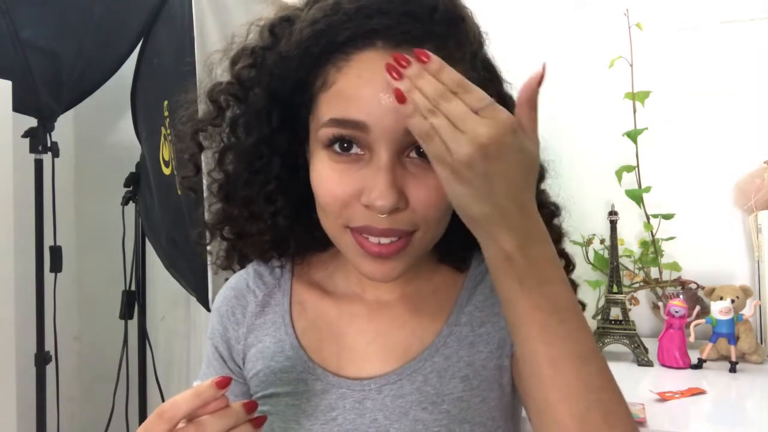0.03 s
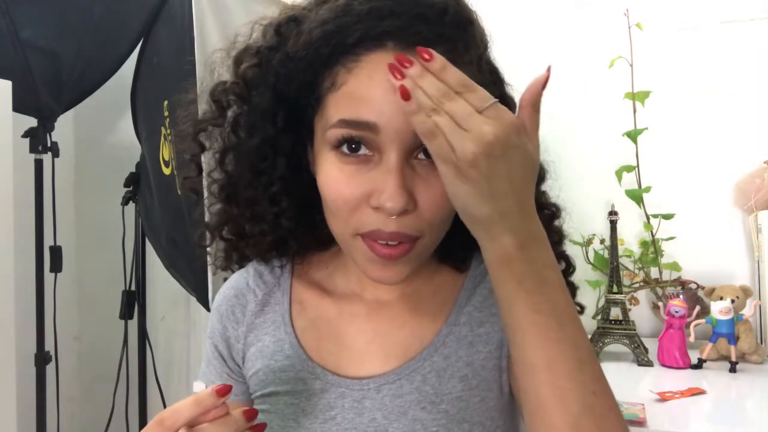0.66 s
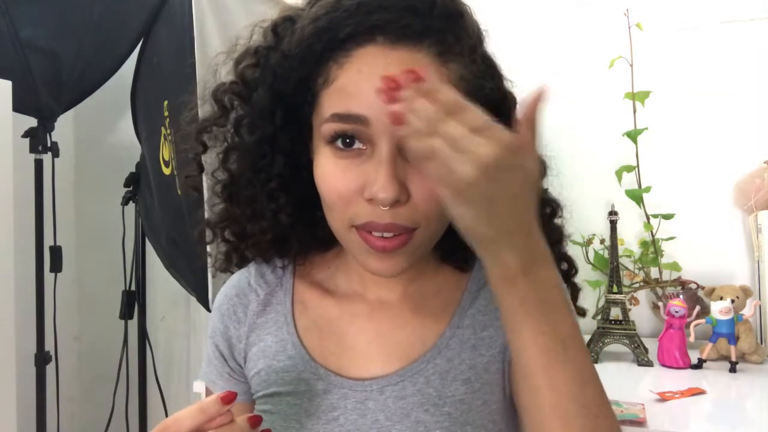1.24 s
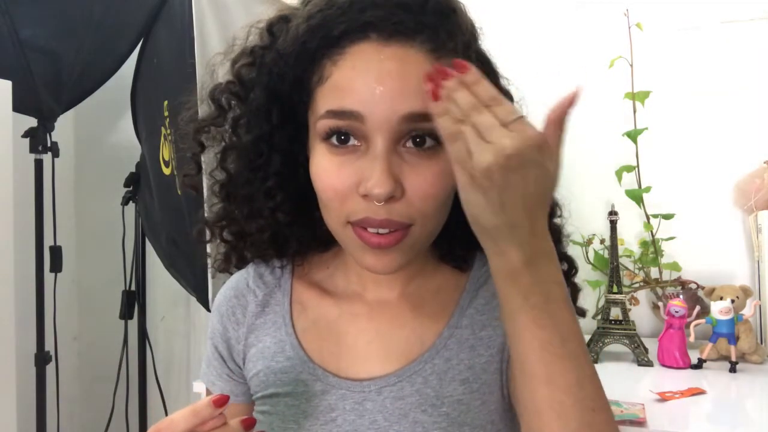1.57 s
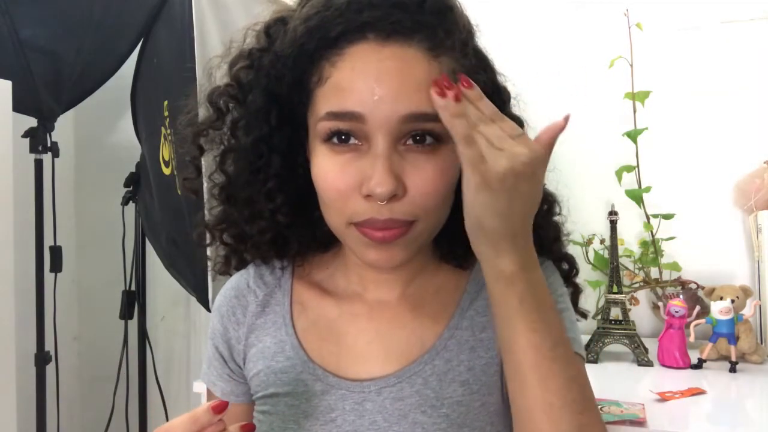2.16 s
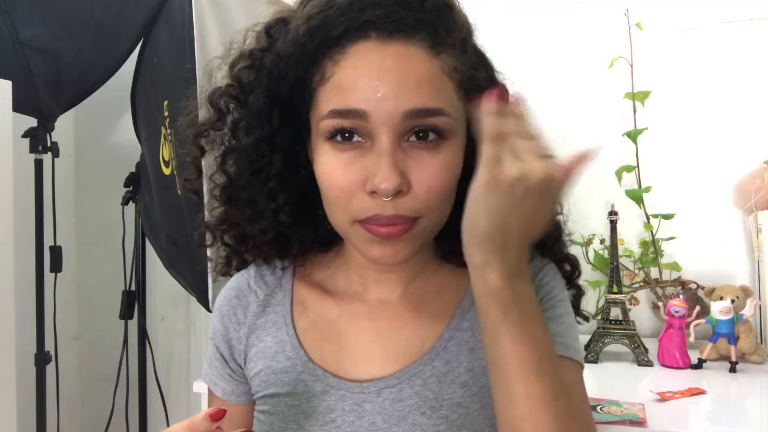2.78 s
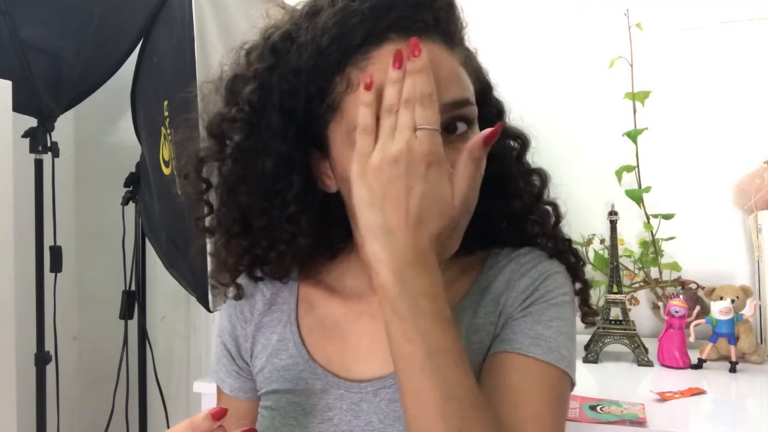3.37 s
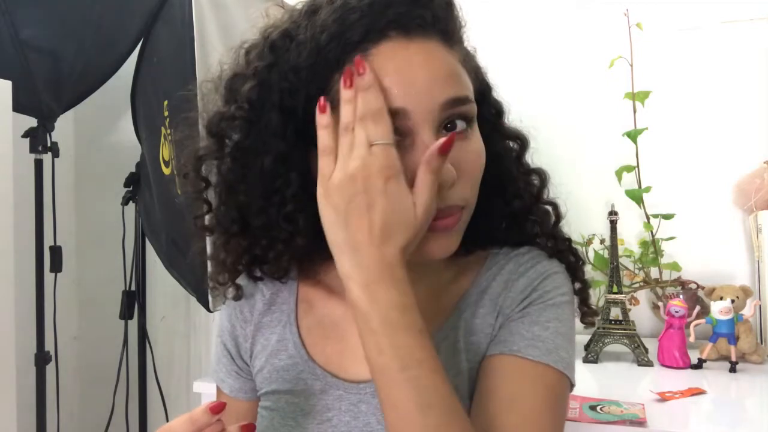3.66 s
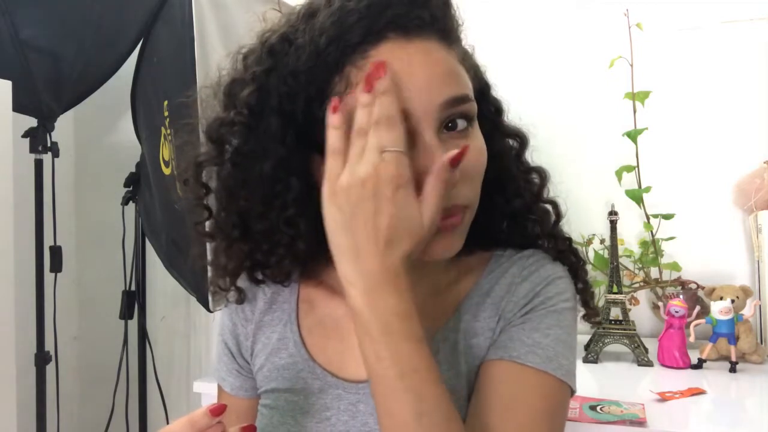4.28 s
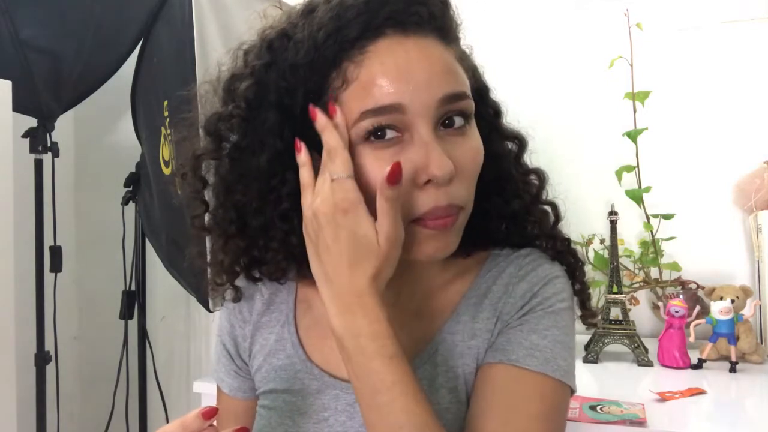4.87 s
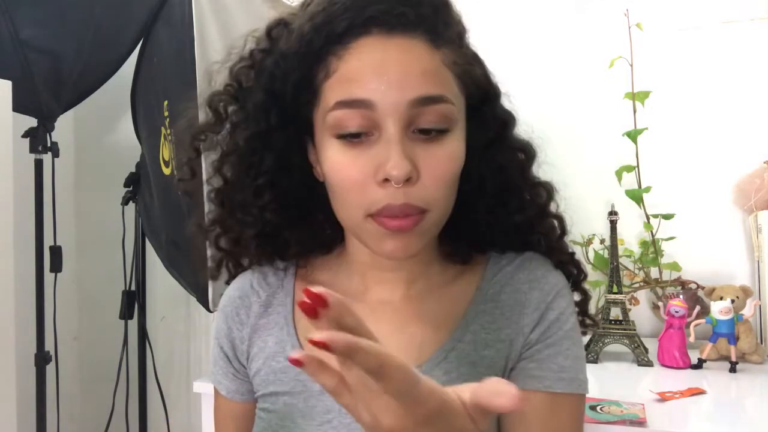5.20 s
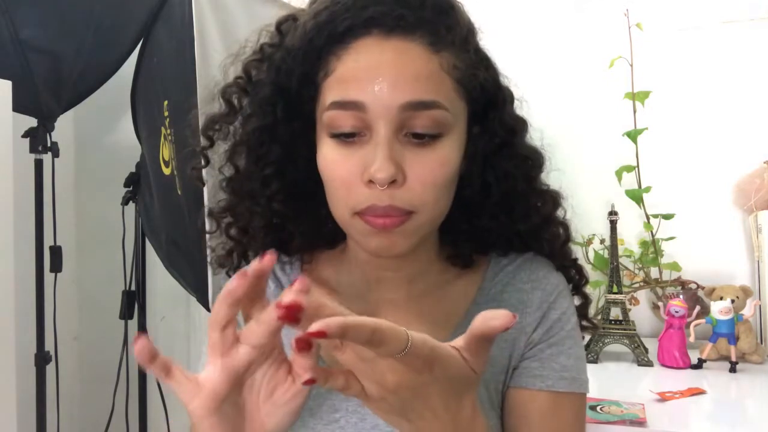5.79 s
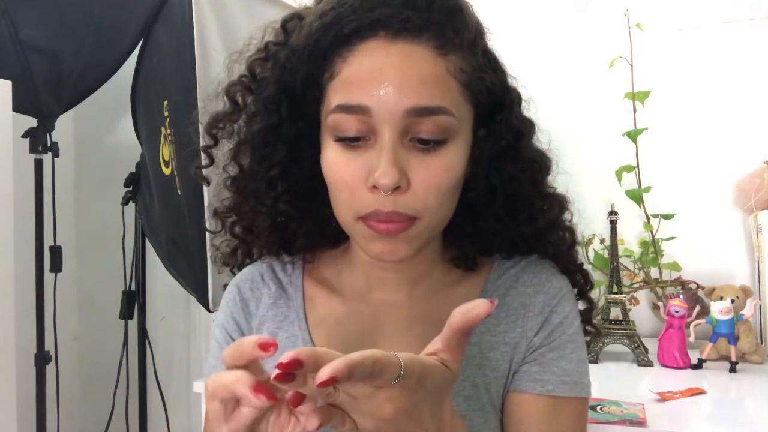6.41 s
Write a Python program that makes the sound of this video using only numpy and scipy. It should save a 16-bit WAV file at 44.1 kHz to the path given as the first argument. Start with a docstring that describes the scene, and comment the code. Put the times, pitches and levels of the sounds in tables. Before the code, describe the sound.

A fan runs in a small room, its low tone swelling and fading beneath a thin, fluttering whine. A steady electrical hum and soft air noise lie under it. A close pair of short high chirps comes early and rings briefly, and a fainter chirp follows later. Fingers brush very lightly over facial skin, and near the end a moving arm stirs a faint rumble at the microphone.

```python
"""A fan's blade tone swells and fades in a small room, while its airflow whines in the housing.
Beneath it lie the steady hum of a second rotor and of mains-powered gear, and soft air noise.
Short high chirps sound twice, first as a close pair, and ring briefly in the room.
Fingers brush over skin with a light friction hiss, and a moving arm stirs a faint rumble."""
import sys
import numpy as np
from scipy import signal
from scipy.fft import rfft, irfft, next_fast_len
from scipy.io import wavfile
from scipy.ndimage import uniform_filter1d

SR = 44100
rng = np.random.default_rng(int(sys.argv[2]) if len(sys.argv) > 2 else 0)


def output_pcm(signal):
    """Save a mono or channel-first signal as 16-bit PCM at the path in sys.argv[1].

    Samples are clipped to [-1, 1] before scaling.
    """
    pcm = np.clip(np.atleast_2d(signal).T, -1, 1) * 32767
    wavfile.write(sys.argv[1], SR, np.round(pcm).astype(np.int16))


N = 284445
TIME = np.arange(N) / SR


def from_db(db):
    """Amplitude ratio of a level: tenfold for every 20 dB."""
    return 10 ** (np.asarray(db) / 20)


def rms_one(x):
    """Normalisation to unit mean power."""
    return x / np.sqrt(np.mean(x ** 2) + 1e-20)


def in_time(rows):
    """Linear interpolation of (t/s, value) points at every sample."""
    return np.interp(TIME, *np.transpose(rows))


def coloured(x, gain_at):
    """Zero-phase filtering: the spectrum is multiplied by a gain that depends on frequency."""
    size = next_fast_len(N)
    hz = np.arange(size // 2 + 1) * SR / size
    return irfft(rfft(x, size) * gain_at(hz), size)[:N]


def resonant_noise(centre_hz, width_hz):
    """Random excitation of a resonance, applied twice, gives a band of noise; rms 1."""
    response = lambda hz: 1 / (1 + ((hz - centre_hz) / (.78 * width_hz)) ** 2)
    return rms_one(coloured(rng.standard_normal(N), response))


def drift(rate_hz):
    """Random fluctuation as low-pass noise; rms 1."""
    return resonant_noise(0, rate_hz)


def tone(hz):
    """A sine of rms 1: its phase is the integral of frequency, from a random start."""
    cycles = np.cumsum(hz * np.ones(N)) / SR + rng.random()
    return np.sqrt(2) * np.sin(2 * np.pi * cycles)


def room(x, wet_db, t60_s=0.57):
    """Reverberation: a diffuse, exponentially decaying tail joins the direct sound."""
    t = TIME[:SR // 2]
    tail = rng.standard_normal(len(t)) * from_db(-60 * t / t60_s)
    return x + from_db(wet_db) * signal.fftconvolve(x, tail / np.linalg.norm(tail))[:N]


def air_noise():
    """Broadband noise of the room's air, its spectral density falling towards the treble."""
    # air noise spectrum: f/Hz, density level/dB per Hz
    spectrum = [(20, -112), (45, -84.5), (110, -83), (150, -88), (250, -79.5), (450, -85), (800, -88),
                (1250, -87.5), (2000, -94.5), (2800, -96.5), (4400, -99.3), (6800, -102.7), (8300, -110),
                (16000, -121)]
    points_hz, points_db = np.transpose(spectrum)
    white = rng.standard_normal(N) * np.sqrt(SR / 2)   # 0 dB per Hz
    return coloured(white, lambda hz: from_db(np.interp(np.log(hz + 1), np.log(points_hz), points_db)))


def microphone_hiss(level_db):
    """Self-noise of the microphone: white, with equal power in every hertz."""
    return from_db(level_db) * rng.standard_normal(N)


def faint_bands():
    """Narrow-band noise: faint steady bands, one a thin ring at the chirps' pitch."""
    # bands of noise: f/Hz, width/Hz, level/dB
    bands = [(179, 18, -70.5), (330, 64, -62.5), (1298, 44, -64.5), (1827, 50, -70), (2201, 74, -69.5),
             (2375, 180, -69), (3873, 75, -76.5), (4490, 110, -76), (4676, 33, -78.5), (9000, 930, -85)]
    return sum(from_db(db) * resonant_noise(hz, width) for hz, width, db in bands)


def arm_rumble(peak_s, peak_db, fade_db_per_s):
    """Air displaced by a passing arm: low noise that rises and dies away exponentially."""
    envelope = from_db(peak_db - fade_db_per_s * np.abs(TIME - peak_s))
    return envelope * resonant_noise(centre_hz=50, width_hz=17)


def finger_rubs(centre_hz, width_hz, grain_db):
    """Sliding friction on skin: slightly grainy noise that swells and fades with each stroke."""
    # finger strokes: middle t/s, duration/s, level/dB
    strokes = [(1.5, .05, -73), (5.09, .13, -74), (5.5, .07, -71)]
    envelope = sum(from_db(db) * np.exp(-(2 * (TIME - s) / length) ** 2) for s, length, db in strokes)
    friction = resonant_noise(centre_hz, width_hz) * from_db(grain_db * drift(120))
    return envelope * rms_one(friction)


def chirps(roughness, octave_db):
    """Rapid random frequency modulation makes short whistles raspy; each has a weak octave."""
    # whistles: start t/s, duration/s, start f/Hz, end f/Hz, level/dB
    whistles = [(0.838, 0.027, 4740, 4620, -56.5), (0.861, 0.052, 4660, 4670, -55.5),
                (2.786, 0.06, 5250, 5040, -72)]
    out = np.zeros(N)
    for start, length, from_hz, to_hz, db in whistles:
        progress = np.clip((TIME - start) / length, 0, 1)
        hz = (from_hz + (to_hz - from_hz) * progress) * (1 + roughness * drift(510))
        swell = np.sqrt(np.abs(np.sin(np.pi * progress)))
        out += from_db(db) * swell * (tone(hz) + from_db(octave_db) * tone(2 * hz))
    return out


def machine_hum(rotor_hz, mains_hz, wander, waver_hz):
    """Periodic forces give a line spectrum; magnetic pull at twice the mains rate adds sidebands."""
    # harmonics of the steady rotor: multiple of its turning rate, level/dB
    rotor_orders = [(2, -74), (3, -72), (4, -62), (5, -59.5), (6, -64), (7, -68), (8, -66.5), (10, -68),
                    (11, -71)]
    # orders shifted up by the magnetic pull: multiple of the turning rate, level/dB
    shifted_orders = [(2, -63.5), (4, -63), (5, -68.5), (7, -71.5), (8, -70.5)]
    # mains hum: multiple of the mains rate, level/dB
    mains_harmonics = [(2, -74.5), (4, -55.5)]
    # other motor drones and thin electronic whistles: f/Hz, level/dB
    lone_tones = [(57.2, -73), (89.5, -71), (118.4, -67), (879, -79), (1064, -92), (4560, -81.5),
                  (5615, -79.5), (6910, -102), (7978, -86.5)]
    turning_hz = rotor_hz * (1 + wander * drift(1.26))
    orders = sum(from_db(db) * tone(k * turning_hz) for k, db in rotor_orders)
    sidebands = sum(from_db(db) * tone(k * turning_hz + 2 * mains_hz) for k, db in shifted_orders)
    mains = sum(from_db(db) * tone(k * mains_hz) for k, db in mains_harmonics)
    lone = sum(from_db(db) * tone(hz + waver_hz * drift(2.2)) for hz, db in lone_tones)
    return orders + sidebands + mains + lone


def housing_whine(even_s, gain_db, sway_db):
    """Airflow excites the housing's modes into a fluttering whine near 1.5 kHz."""
    # main modes of the fan housing: f/Hz, width/Hz, relative level/dB
    modes = [(1466.6, 46, -6), (1484, 13.6, -4), (1521.5, 15.5, -6), (1537, 64, -9), (1624, 62, -10)]
    # slow envelope of the whine: t/s, level before gain/dB
    envelope = [(0.0, -52), (0.03, -49), (0.86, -53), (0.99, -49), (2.96, -51.5), (3.07, -46.5),
                (3.14, -50), (5.12, -49.5), (5.71, -46.5), (5.77, -52), (5.89, -49), (6.45, -50.5)]
    whine = sum(from_db(db) * resonant_noise(hz, width) for hz, width, db in modes)
    # the fast flutter stays; the slow level is evened out, then sways with the airflow
    whine /= np.sqrt(uniform_filter1d(whine ** 2, int(even_s * SR)))
    level_db = in_time(envelope) + gain_db + sway_db * drift(2.8)
    return from_db(level_db) * whine


def blade_tone(blade_hz, wander_hz, gain_db, turbulence_db):
    """A tone at the blade-passing frequency beats with narrow-band turbulence and so flutters."""
    # irregular swelling and fading of the unbroken tone: t/s, level before gain/dB
    envelope = [(0.0, -43), (0.29, -48.5), (0.63, -59.5), (0.75, -43.5), (0.95, -44.5), (0.99, -52.5),
                (1.47, -44), (1.51, -55), (1.56, -44.5), (1.71, -38.5), (1.87, -42), (2.06, -57),
                (2.26, -45.5), (2.51, -41.5), (2.6, -58), (2.66, -49), (2.73, -70), (2.78, -50), (3.2, -43),
                (3.32, -61), (3.43, -37.5), (3.61, -44.5), (4.58, -49), (4.69, -41.5), (4.78, -50.5),
                (5.78, -63), (5.87, -52), (6.14, -63), (6.23, -46), (6.45, -58)]
    level_db = in_time(envelope)
    swing_db = .4 * (level_db - level_db.mean())   # the turbulence follows part of the tone's swing
    turbulence = from_db(turbulence_db + swing_db) * resonant_noise(blade_hz, width_hz=13.7)
    passing_hz = blade_hz + wander_hz * drift(2.55)
    return from_db(level_db + gain_db) * tone(passing_hz) + turbulence


def scene():
    """Superposition: the pressures of all sources add at one microphone."""
    mix = blade_tone(blade_hz=279.8, wander_hz=0.767, gain_db=-0.95, turbulence_db=-56.5)
    mix += machine_hum(rotor_hz=50.6, mains_hz=60.07, wander=0.00092, waver_hz=0.714)
    mix += housing_whine(even_s=0.27, gain_db=0.74, sway_db=0.4)
    mix += faint_bands()
    mix += finger_rubs(centre_hz=10000, width_hz=8000, grain_db=2)
    mix += air_noise()
    mix += arm_rumble(peak_s=5.06, peak_db=-59.5, fade_db_per_s=45)
    mix += microphone_hiss(level_db=-68.5)
    mix += room(chirps(roughness=.022, octave_db=-16), wet_db=-0.5)
    return mix[None]


def record(dry, cutoff_hz=15720):
    """Linear filtering: two narrow dips in the treble, and no sound above about 15.7 kHz."""
    # treble dips: f/Hz, width/Hz, gain/dB
    dips = [(4820, 440, -2), (10420, 440, -4)]
    dip_db = lambda hz: sum(db * np.exp(-((hz - centre) / width) ** 2) for centre, width, db in dips)
    low_pass = lambda hz: np.clip((cutoff_hz - hz) / 60 + .5, 0, 1)
    return np.array([coloured(channel, lambda hz: from_db(dip_db(hz)) * low_pass(hz)) for channel in dry])


dry = scene()
out = record(dry)
output_pcm(out)
```